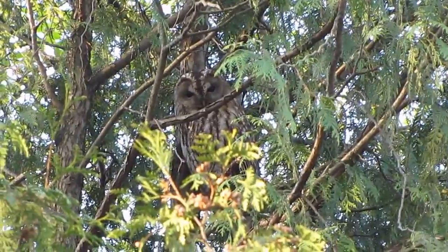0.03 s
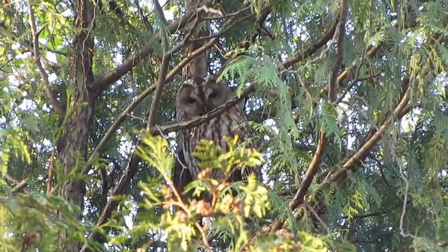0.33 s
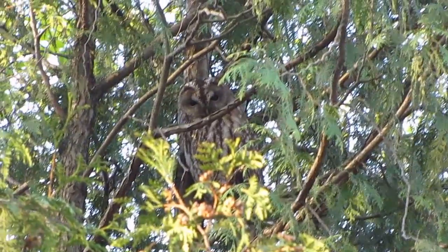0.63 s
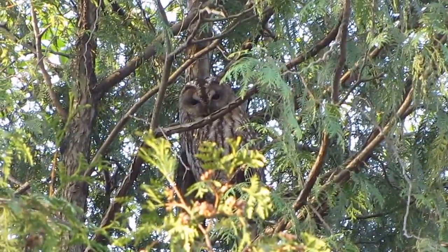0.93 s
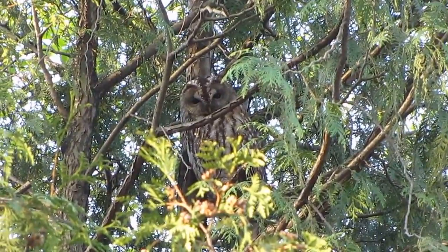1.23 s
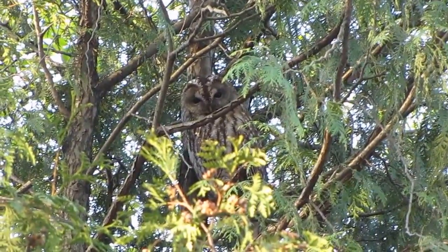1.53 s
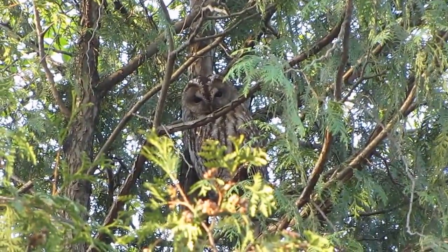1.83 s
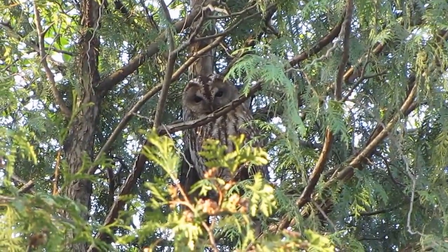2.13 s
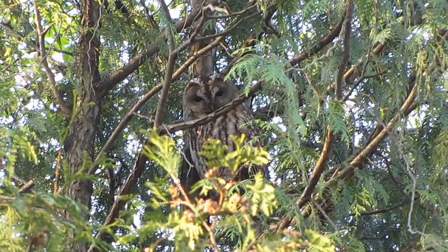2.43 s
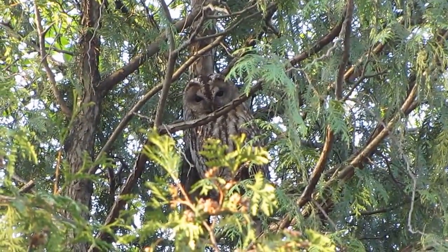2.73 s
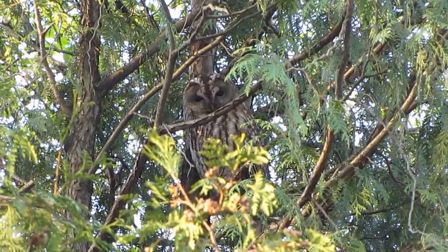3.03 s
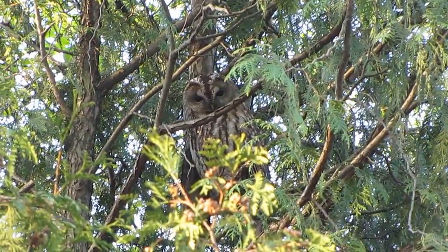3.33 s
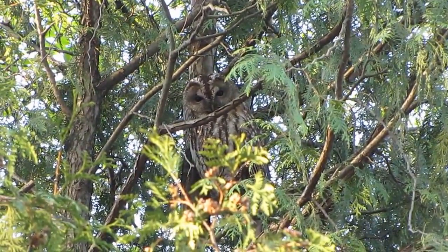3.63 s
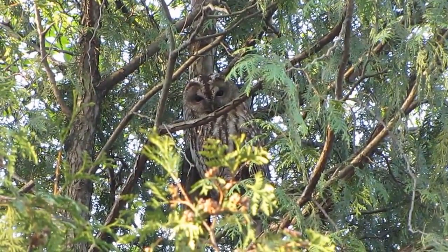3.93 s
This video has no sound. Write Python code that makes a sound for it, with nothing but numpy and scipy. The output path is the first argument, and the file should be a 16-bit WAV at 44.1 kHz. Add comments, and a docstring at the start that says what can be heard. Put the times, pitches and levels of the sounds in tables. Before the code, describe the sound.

Small songbirds sing in a wood. One repeats high falling whistles that end in a trill, another answers with sharp calls and two nasal notes. Farther birds buzz and warble, echoing softly over distant traffic rumble and steady hiss.

```python
"""In a wood, small songbirds call over the low rumble of distant traffic and a steady hiss.
A tit repeats a phrase of falling whistles that ends in a trill; a second answers with sharp calls and
two nasal notes. Farther birds buzz, hold thin whistles, chip and warble; a rasping flourish comes last.
The nasal notes are harmonics filtered by the throat; all other notes are frequency-modulated tones.
Trunks and foliage scatter every note into a soft reverberant tail."""
import sys
import numpy as np
from scipy import signal
from scipy.fft import rfft, irfft
from scipy.io import wavfile

SR = 44100
rng = np.random.default_rng(int(sys.argv[2]) if len(sys.argv) > 2 else 0)


def unload_audio(sound):
    """Save the sound as a 16-bit wav file, at the path given as the first command line argument."""
    columns = np.transpose(np.atleast_2d(sound))
    # keep every value between -1 and 1, then stretch to whole-number steps
    steps = np.round(np.clip(columns, -1, 1) * 32767)
    wavfile.write(sys.argv[1], SR, steps.astype(np.int16))


N = 176400


def amp(db):
    """Amplitude ratio of a level in decibels."""
    return 10 ** (np.asarray(db) / 20)


def unit(x):
    """Normalisation to rms 1."""
    return x / np.sqrt(np.mean(x ** 2) + 1e-20)


def level_at(spectrum, hz):
    """Interpolation of a spectrum's level on a log-frequency axis."""
    f, db = np.transpose(spectrum)
    return np.interp(np.log(hz + 1), np.log(f), db)


def add(mix, start, sound):
    """Superposition of a sound on the mix, from a start time in seconds."""
    at = round(start * SR)
    sound = sound[max(-at, 0):]
    part = mix[max(at, 0):][:len(sound)]
    part += sound[:len(part)]


def drift(size, rate_hz):
    """Low-pass filtered noise: a smooth random fluctuation of rms about 1."""
    f = np.fft.rfftfreq(SR, 1 / SR)
    spectrum = rfft(rng.standard_normal(SR)) / (1 + (f / rate_hz) ** 4)
    return np.resize(unit(irfft(spectrum)), size)


def gate(t, attack_s, release_s):
    """Amplitude envelope with a quarter-sine onset and decay."""
    onset = np.sin(np.pi / 2 * np.clip(t / attack_s, 0, 1))
    decay = np.sin(np.pi / 2 * np.clip((t[-1] - t) / release_s, 0, 1))
    return onset * decay


def phase(hz, waver, rate_hz):
    """Phase as the integral of frequency, which wavers randomly by a given fraction."""
    return 2 * np.pi * np.cumsum(hz * (1 + waver * drift(len(hz), rate_hz))) / SR


def whistle(hz, waver=0.0038, flutter_db=1.5):
    """A nearly pure tone with slight random modulation of frequency and amplitude."""
    return np.sqrt(2) * np.sin(phase(hz, waver, 155)) * amp(flutter_db * drift(len(hz), 76))


# Independent noise in the right ear, relative to the shared noise (frequency [Hz], level [dB])
INCOHERENCE = [(30, -23), (125, -19), (350, -8), (700, -4), (1300, 9.5), (2000, 16.5), (8000, 26)]
# Balance of the noise between the ears (frequency [Hz], left minus right [dB])
BALANCE = [(35, -2.5), (85, -3.5), (180, 0), (700, -0.9), (1500, 0.3), (8000, 0)]
def diffuse_noise(colour):
    """Partial coherence: coloured noise, nearly alike at both ears in the bass, unlike in the treble."""
    f = np.fft.rfftfreq(N, 1 / SR)
    shared, independent = rfft(rng.standard_normal((2, N)))
    spread, balance_db = amp(level_at(INCOHERENCE, f)), level_at(BALANCE, f)
    left = shared * amp(balance_db / 2)
    right = (shared + spread * independent) / np.hypot(1, spread) * amp(-balance_db / 2)
    return unit(irfft(np.array([left, right]) * colour, N))


# Spectrum of distant traffic before band limiting (frequency [Hz], relative level [dB])
TRAFFIC_SPECTRUM = [(20, -7), (33, -4), (45, 1.5), (62, 1.5), (78, -4), (95, -4.5), (140, -10.5),
                    (182, -13), (277, -11), (561, -20), (705, -21.5), (975, -24.5), (1630, -38.5),
                    (1900, -39)]
# Swell of the lowest rumble (time [s], gain [dB])
BASS_SWELL = [(0, -1), (1.2, 1), (1.55, -2), (1.75, 3), (1.93, 3.5), (2.05, -2.5), (2.55, -2), (2.8, 2.5),
              (3.05, -2), (3.45, -2), (3.6, 4), (4, -1.5)]
def traffic(db=-33, bass_top_hz=76):
    """Low-frequency noise of distant traffic, with slow amplitude modulation of its bass."""
    f = np.fft.rfftfreq(N, 1 / SR)
    passband = f / np.hypot(f, 12) / (1 + (f / 2100) ** 8)
    rumble = diffuse_noise(amp(level_at(TRAFFIC_SPECTRUM, f)) * passband)
    bass = irfft(rfft(rumble) / (1 + (f / bass_top_hz) ** 6), N)
    swell = amp(np.interp(np.arange(N) / SR, *np.transpose(BASS_SWELL)))
    return amp(db) * (rumble + bass * (swell - 1))


# Tones of distant engines (frequency [Hz], level [dB])
ENGINE_TONES = [(398, -61), (695, -63)]
def engine_hum():
    """Tonal noise of distant engines: faint sinusoids that wander slowly in frequency."""
    return sum(amp(db) * np.sqrt(2) * np.sin(phase(np.full(N, hz), waver=0.00501, rate_hz=5.08))
               for hz, db in ENGINE_TONES)


# Spectrum of the wood's hiss (frequency [Hz], relative level [dB])
HISS_SPECTRUM = [(1000, -22), (1900, 2), (2600, 6.5), (3400, 3.5), (4500, 2.5), (6000, -1), (8000, -6),
                 (11000, -9.5), (15500, -15)]
def wood_hiss(db=-58):
    """Stationary broadband noise, heard as the hiss of the wood."""
    f = np.fft.rfftfreq(N, 1 / SR)
    return amp(db) * diffuse_noise(amp(level_at(HISS_SPECTRUM, f)))


# First tit's song (time [s], duration [s], slide top [Hz], slide foot [Hz], flick [Hz], source level [dB])
TIT_SONG = [(-.01, 0.06, 6300, 5300, 0, -46), (0.231, 0.15, 7220, 6780, 752, -47.5),
            (0.454, 0.16, 7300, 5790, 750, -42), (0.702, 0.058, 6450, 5200, 2, -44.5),
            (1.036, 0.15, 7330, 6670, 205, -47.5), (1.266, .16, 7200, 5770, 500, -48),
            (1.512, 0.056, 6500, 5400, 0, -45), (1.859, 0.13, 7230, 6710, 201, -43),
            (2.08, 0.17, 7220, 5700, 702, -38.5), (2.324, 0.059, 6300, 5140, 13, -41.5),
            (2.671, 0.14, 7200, 6750, 348, -45.5), (2.897, 0.17, 7200, 5650, 700, -38),
            (3.147, .062, 6300, 5110, 3, -41), (3.353, 0.024, 5450, 4840, -10, -48),
            (3.459, 0.024, 5330, 4850, -8, -45), (3.547, 0.032, 5500, 4900, -8, -43),
            (3.641, 0.027, 5650, 4820, 0, -40), (3.737, .026, 5750, 4800, 2, -38.5)]
def song_note(start, length, upper_hz, lower_hz, flick_hz, db):
    """A downward glide in frequency: the whistle flicks down, slides as it swells, then drops away."""
    t = np.arange(0, length, 1 / SR)
    slide = upper_hz + (lower_hz - upper_hz) * t / length
    flick = flick_hz * np.exp(-t / .019)
    drop = 6100 * length * np.exp((t - length) / .01005)  # longer notes end in a deeper drop
    swell_db = -9 * np.maximum(1 - t / length / 0.69, 0)
    return start, amp(db + swell_db) * gate(t, 0.0068, 0.013) * whistle(slide + flick - drop)


# Buzzes (time [s], duration [s], source level [dB])
BUZZ_NOTES = [(.02, .16, -39.5), (1.478, .16, -41.5), (2.805, 0.14, -39)]
def buzz(start, length, db, rate_hz=45, low_hz=3270, span_hz=621, wobble_hz=118.6, dip_db=10):
    """Periodic modulation: once in each cycle the frequency spikes upward and the level dips."""
    t = np.arange(0, length, 1 / SR)
    spike = np.sin(np.pi * rate_hz * t) ** 4
    hz = low_hz + span_hz * spike + wobble_hz * drift(len(t), 300)
    return start, amp(db - dip_db * spike) * gate(t, 0.047, 0.061) * whistle(hz)


# Thin far whistles (time [s], duration [s], first pitch [Hz], settled pitch [Hz], source level [dB])
FAR_WHISTLES = [(0.037, 0.082, 4150, 4100, -53), (.07, 0.2, 4750, 4430, -56.5),
                (0.433, 0.076, 4130, 4080, -51.5), (0.592, .06, 3350, 3417, -55),
                (.72, 0.066, 3400, 3350, -61), (0.817, 0.077, 4150, 4110, -53),
                (0.933, .055, 8100, 7750, -64), (0.994, 0.11, 3380, 3250, -55.5),
                (1.398, 0.24, 1990, 1975, -68), (1.74, 0.24, 7500, 7460, -64.5),
                (1.98, 0.26, 7600, 7520, -61), (2.565, 0.347, 4810, 4488, -57)]
# Nearer short peeps (time [s], duration [s], first pitch [Hz], settled pitch [Hz], source level [dB])
NEAR_PEEPS = [(1.304, 0.041, 4320, 4600, -50), (1.52, 0.048, 4420, 4380, -46.5)]
def thin_whistle(start, length, first_hz, settled_hz, db, settle_s=.04):
    """Exponential relaxation: a held tone settles toward a steady frequency."""
    t = np.arange(0, length, 1 / SR)
    hz = settled_hz + (first_hz - settled_hz) * np.exp(-t / settle_s)
    return start, amp(db) * gate(t, 0.0094, 0.014) * whistle(hz, waver=0.0058)


# Falling chips (time [s], source level [dB])
CHIP_NOTES = [(0.34, -51.5), (.494, -52), (.634, -50), (.778, -51.5), (0.916, -51)]
def chip(start, db, length=.036, top_hz=4250, end_hz=2477):
    """An exponential sweep: the frequency falls steeply, by equal ratios in equal times."""
    t = np.arange(0, length, 1 / SR)
    hz = top_hz * (end_hz / top_hz) ** (t / length)
    return start, amp(db) * gate(t, 0.016, 0.016) * whistle(hz)


# Second tit's sharp calls (time [s], duration [s], source level [dB])
TIT_CALLS = [(1.160, 0.067, -46), (1.313, 0.055, -43), (1.478, .068, -44.5)]
def sharp_call(start, length, db, low_hz=4510, top_hz=7360, end_hz=6140, rise_s=.011, fall_s=.025):
    """A frequency transient: a quick upward snap, then an exponential fall that levels out."""
    t = np.arange(0, length, 1 / SR)
    rise = np.sin(np.pi / 2 * np.minimum(t / rise_s, 1))
    fall_hz = end_hz + (top_hz - end_hz) * np.exp(-np.maximum(t - rise_s, 0) / fall_s)
    hz = low_hz + (fall_hz - low_hz) * rise
    return start, amp(db) * gate(t, 0.025, .012) * whistle(hz, waver=.012, flutter_db=2.0)


# Low warbles (time [s], duration [s], first pitch [Hz], middle [Hz], last [Hz], source level [dB])
WARBLE_NOTES = [(1.173, 0.065, 3490, 3800, 2730, -59), (1.253, .04, 2490, 3350, 2720, -51),
                (1.62, 0.086, 2593, 2390, 2910, -53.5), (1.868, 0.039, 2954, 2470, 2500, -46),
                (1.912, .045, 2850, 2330, 3010, -45.5), (1.955, .035, 3080, 2950, 2550, -48),
                (2.105, 0.027, 2880, 2623, 2590, -50), (2.15, 0.0682, 3140, 2650, 2610, -46),
                (2.74, 0.072, 2640, 2460, 2600, -54), (2.975, 0.039, 2746, 2450, 2850, -47),
                (3.018, 0.04, 2816, 2470, 3050, -42.5), (3.235, 0.0748, 3020, 2520, 2635, -44.5)]
def warble(start, length, first_hz, middle_hz, last_hz, db):
    """Frequency modulation along two half-parabolas that meet at the middle pitch."""
    t = np.arange(0, length, 1 / SR)
    from_middle = 2 * t / length - 1
    outer_hz = np.where(from_middle < 0, first_hz, last_hz)
    hz = middle_hz + (outer_hz - middle_hz) * from_middle ** 2
    return start, amp(db) * gate(t, 0.011, .012) * whistle(hz, waver=.022, flutter_db=2.0)


# Second tit's nasal notes (time [s], duration [s], fundamental [Hz], sag [Hz], source level [dB])
NASAL_NOTES = [(1.744, 0.073, 638.7, 10.2, -46), (1.875, .088, 617.4, 75, -43.5)]
# Frequency response of the throat (frequency [Hz], relative gain [dB])
THROAT_RESPONSE = [(1500, -27), (3000, -16), (3900, -22), (4450, 2.5), (4800, 3), (5400, -10.5),
                   (6000, -11), (6700, -23), (8000, -30), (12000, -38)]
def nasal_note(start, length, pitch_hz, sag_hz, db):
    """Source and filter: of a harmonic series arching in pitch, the throat passes a few high partials."""
    t = np.arange(0, length, 1 / SR)
    scoop = 1 - .2 * np.exp(-t / 0.00913)
    hz = (pitch_hz - sag_hz * (t / length) ** 1.5) * scoop
    angle = phase(hz, waver=0.0034, rate_hz=200)
    partials = sum(amp(level_at(THROAT_RESPONSE, k * hz)) * np.sin(k * angle) for k in range(3, 20))
    return start, amp(db) * gate(t, 0.024, 0.013) * unit(partials)


# Contour of the closing flourish (time [s], pitch [Hz], source level [dB], frequency deviation [Hz])
FLOURISH_CONTOUR = [(3.778, 2620, -63, 0), (3.797, 3390, -49.5, 0), (3.808, 3700, -49.5, 0),
                    (3.819, 4400, -45, 0), (3.842, 4330, -48, 50), (3.875, 4310, -51, 600),
                    (3.9, 4820, -47, 502), (3.94, 4200, -44, 600), (4.0, 4040, -47.5, 603)]
def flourish(rasp_hz=120):
    """Roughness from fast frequency modulation: a clean rising note breaks into a rasp."""
    times, pitch_hz, db, deviation_hz = np.transpose(FLOURISH_CONTOUR)
    t = np.arange(times[0], times[-1], 1 / SR)
    shake = np.sin(phase(np.full(len(t), rasp_hz), waver=0.196, rate_hz=102))
    hz = np.interp(t, times, pitch_hz) + shake * np.interp(t, times, deviation_hz)
    return t[0], amp(np.interp(t, times, db)) * whistle(hz, waver=0.011)


def echoes(t60_s, build_s, taps_per_s=3000):
    """Scattering by trunks and leaves: a decaying impulse response, different for each ear."""
    t = np.arange(int(1.5 * SR)) / SR
    taps = rng.standard_normal((2, len(t))) * (rng.random((2, len(t))) < taps_per_s / SR)
    taps = taps * amp(-60 * t / t60_s) * (1 - np.exp(-t / build_s))
    return taps / np.linalg.norm(taps, axis=1, keepdims=True)


# Paths from each perch (left minus right [dB], left ear's lead [ms], direct [dB], scatter [dB], tail [dB])
PERCH_PATHS = {"song": (-5.5, 0.08, -2.5, -10, -17), "call": (-0.5, .072, -5.5, -7, -15),
               "nasal": (-2.5, -.085, -4.5, -7, -20), "chip": (8, 2.5, -0.5, -9, -6),
               "buzz": (4.5, 1.4, -4, -7, -5), "whistle": (3.5, 0.35, -3.5, -3.5, -8),
               "peep": (0, 0.5, -4, -8, -11), "warble": (-2, -.09, -4.5, -7.5, -4),
               "flourish": (-4, 0.33, -4, -4, -2)}
def perch(name, notes):
    """Interaural level and time differences place a bird; near scatter and a far tail follow it."""
    pan_db, lead_ms, direct_db, scatter_db, tail_db = PERCH_PATHS[name]
    voice = np.zeros(N)
    for start, sound in notes:
        add(voice, start, sound)
    f = np.fft.rfftfreq(2 * N, 1 / SR)
    at_right_ear = irfft(rfft(voice, 2 * N) * np.exp(-2j * np.pi * f * lead_ms / 1000))[:N]
    sides = unit(amp([[pan_db / 2], [-pan_db / 2]]))
    direct = amp(direct_db) * sides * np.array([voice, at_right_ear])
    scatter = amp(scatter_db) * sides ** .5 * echoes(t60_s=0.38, build_s=0.007)
    tail = amp(tail_db) * echoes(t60_s=1.32, build_s=.04)
    return direct + signal.fftconvolve(voice[None], scatter + tail, axes=1)[:, :N]


def scene():
    """Superposition of traffic, hum, hiss and all the birds on their perches."""
    birds = [("song", song_note, TIT_SONG), ("buzz", buzz, BUZZ_NOTES),
             ("whistle", thin_whistle, FAR_WHISTLES), ("chip", chip, CHIP_NOTES),
             ("call", sharp_call, TIT_CALLS), ("warble", warble, WARBLE_NOTES),
             ("peep", thin_whistle, NEAR_PEEPS), ("nasal", nasal_note, NASAL_NOTES)]
    mix = traffic() + engine_hum() + wood_hiss()
    for name, voice, rows in birds:
        mix += perch(name, [voice(*row) for row in rows])
    return mix + perch("flourish", [flourish()])


def record(dry, cutoff_hz=15720):
    """Band limiting: a linear-phase low-pass filter removes the highest treble."""
    lowpass = signal.firwin(1023, cutoff_hz, window=("kaiser", 9), fs=SR)
    return signal.oaconvolve(dry, lowpass[None], "same")


dry = scene()
out = record(dry)
unload_audio(out)
```